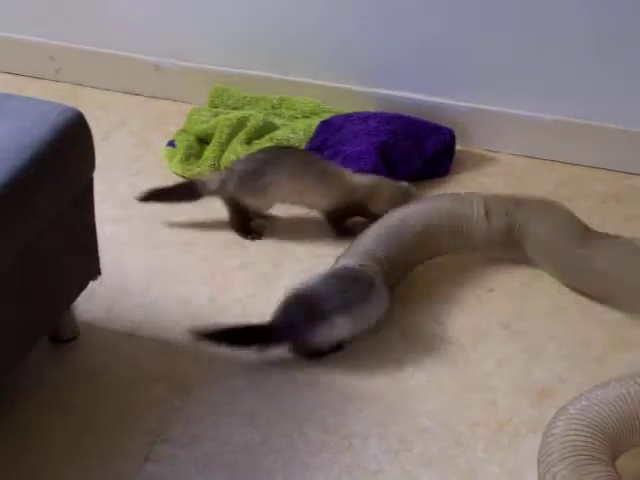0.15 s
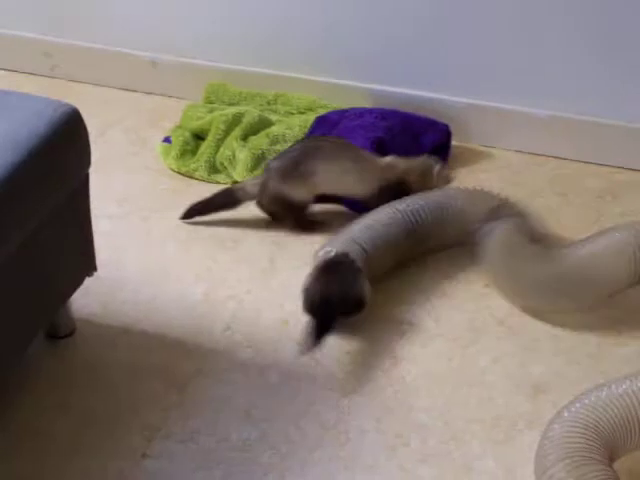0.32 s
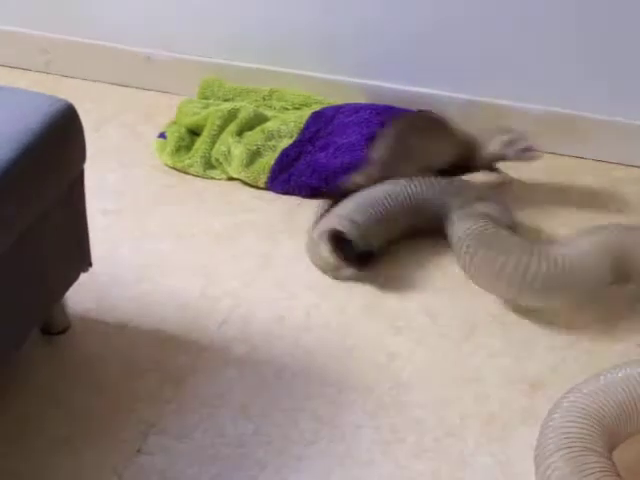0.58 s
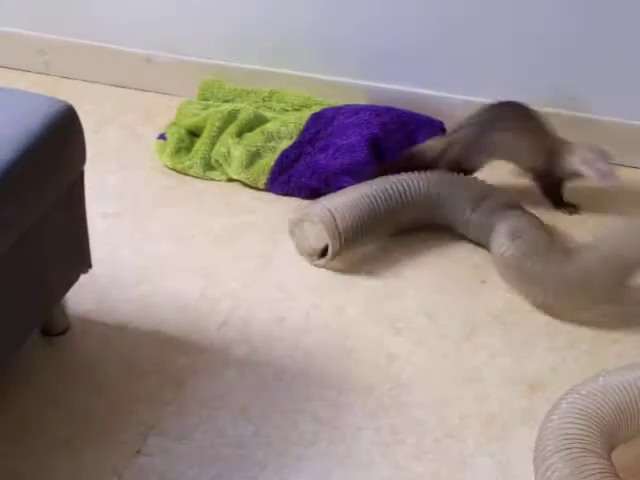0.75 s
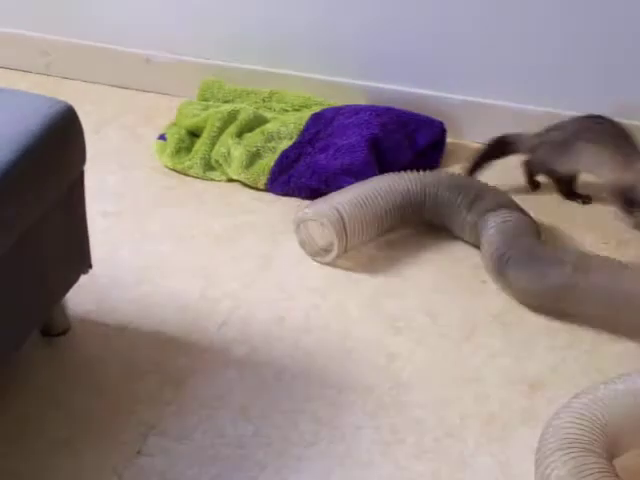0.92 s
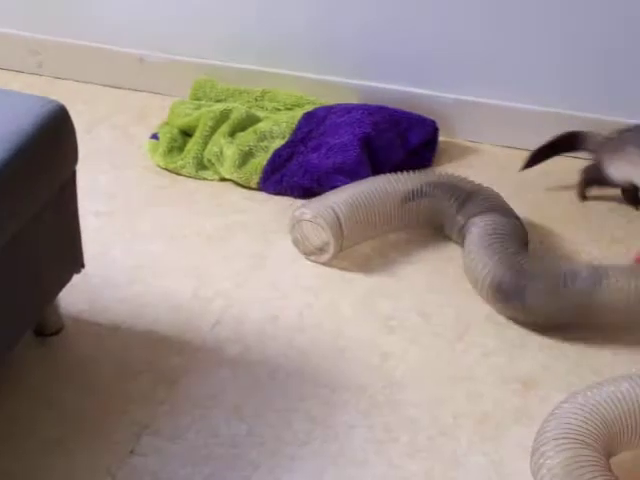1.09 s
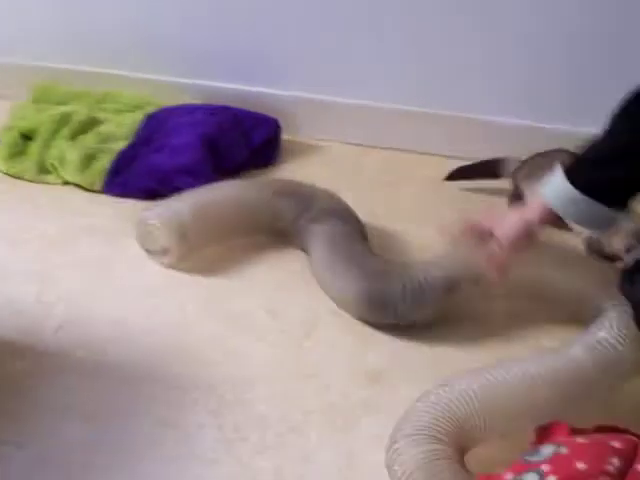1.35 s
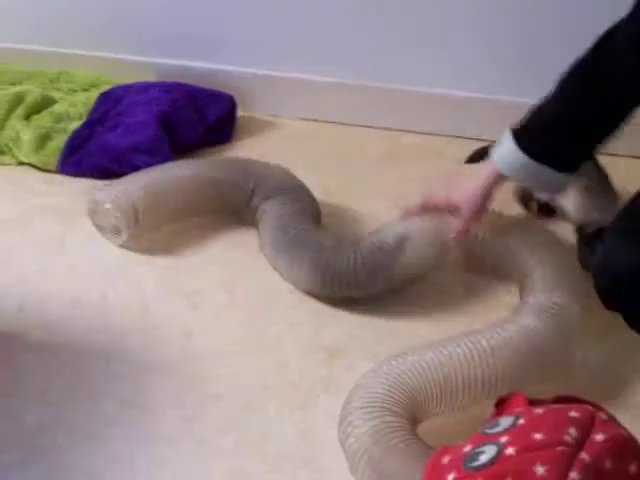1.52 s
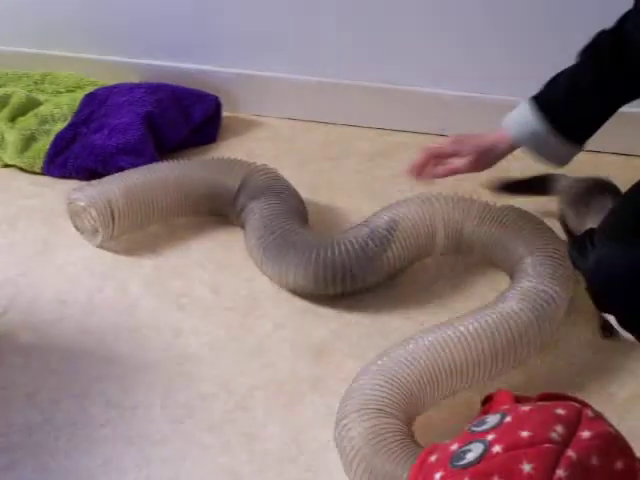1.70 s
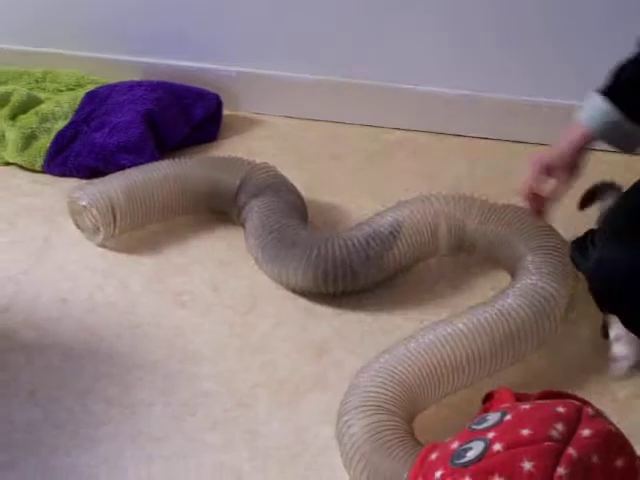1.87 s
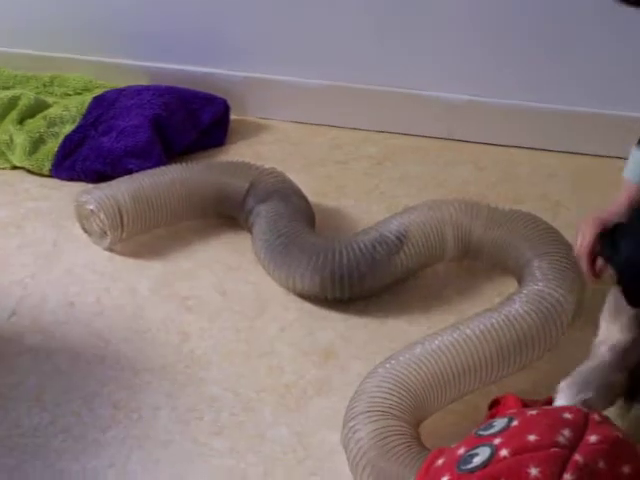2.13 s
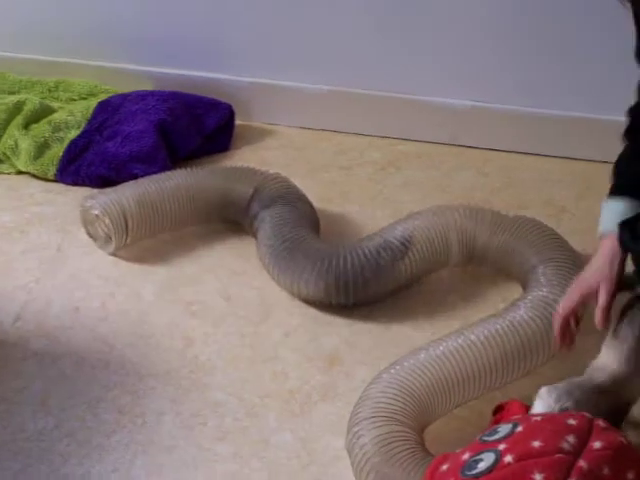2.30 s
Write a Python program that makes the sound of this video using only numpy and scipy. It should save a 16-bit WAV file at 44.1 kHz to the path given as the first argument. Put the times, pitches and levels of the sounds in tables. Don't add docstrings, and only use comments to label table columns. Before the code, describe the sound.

A corrugated plastic tube clatters on a hard floor as a ferret scrambles inside. Light clicks and scraping begin at once, swelling by 0.35 seconds into loud irregular knocks, strongest from 0.5 to 1.25, with rattling tails, hollow rings and dull thuds. Knocks continue until 1.8, then drop away. Around 2 seconds come a soft bump, tiny squeak and faint paw brushes, over quiet room air and short echoes.

```python
import sys
import numpy as np
from scipy import signal
from scipy.fft import rfft, irfft
from scipy.io import wavfile
from scipy.ndimage import uniform_filter1d

SR = 44100
rng = np.random.default_rng(int(sys.argv[2]) if len(sys.argv) > 2 else 0)


def waveform_to_disk(signal):
    frames = np.transpose(np.atleast_2d(signal))
    scaled = np.clip(frames, -1, 1) * 32767
    samples = np.round(scaled).astype(np.int16)
    wavfile.write(sys.argv[1], SR, samples)


def volts_from_decibels(level):
    exponent = np.asarray(level, float) / 20
    return 10 ** exponent


N = 103635

# start in seconds, peak level in dB.
KNOCKS = [(.082, -22), (.131, -27), (.221, -18), (.233, -15), (.349, -9), (.382, -10), (.475, -5),
          (.598, -18), (.65, -7), (.7, -3), (.865, -15), (.888, -6), (1.03, -16), (1.048, -3), (1.24, -2),
          (1.309, -17), (1.424, -20), (1.457, -8), (1.529, -15), (1.579, -22), (1.65, -13), (1.659, -7),
          (1.803, -8)]
# wall ring level in dB, wall pitch in Hz, clatter tail level in dB.
KNOCK_AFTERMATH = [(-40.5, 1100, -11), (-40.5, 1700, -8.5), (-31.5, 870, -27), (-28, 734, -35.5),
                   (-28, 590, -7.5), (-24, 1000, -21.5), (-27, 880, -13), (-27.5, 750, -12.5),
                   (-23.5, 1040, -22), (-23, 1230, -13.5), (-35, 1700, -21.5), (-24.5, 1540, -16),
                   (-37.5, 920, -11), (-30.5, 1500, -15.5), (-24, 850, -30.5), (-30, 860, -14),
                   (-29.5, 970, -5.5), (-34, 590, -14), (-28.5, 1050, -10), (-31, 900, -11.5),
                   (-23, 1040, -23.5), (-44.5, 460, -16.5), (-27.5, 900, -16.5)]
# frequency in Hz, level in dB per Hz.
RIB_COLOUR = [(260, -27), (450, -14), (620, -1.5), (1190, -7.5), (2070, -3), (3110, 4), (3650, 5.5),
              (6670, -12), (8530, -23.5), (11100, -17.5), (18800, -120)]
# start in seconds, peak level in dB, pitch in Hz.
AIR_RINGS = [(0.099, -43, 307), (0.223, -37, 465), (0.354, -19, 273), (0.418, -28, 313), (0.465, -24, 311),
             (0.493, -24.5, 296), (0.598, -21, 325), (0.641, -26, 350), (0.7, -21.5, 331),
             (0.89, -21.5, 336), (0.974, -27, 257), (1.048, -19, 376.5), (1.118, -33, 390),
             (1.241, -22, 373), (1.305, -29, 295), (1.387, -28, 255), (1.41, -23.5, 267),
             (1.456, -21.5, 367), (1.526, -30.5, 368), (1.637, -31.5, 241), (1.69, -30.5, 299),
             (1.805, -32, 323), (2.08, -45, 372), (2.169, -38, 310), (2.321, -43, 385)]
# start in seconds, peak level in dB, pitch in Hz.
FLOOR_THUDS = [(0.223, -22.5, 105.7), (0.367, -19, 127), (0.476, -19, 102.4), (0.666, -20.5, 126),
               (0.713, -21, 145), (0.893, -25, 98.4), (1.052, -21, 105), (1.087, -29, 143),
               (1.226, -25, 102), (1.258, -22, 99.6), (1.466, -22.5, 118), (1.608, -27.5, 106),
               (1.658, -26, 156.6), (1.729, -33, 138), (1.814, -25, 107), (2.059, -36.5, 108),
               (2.128, -42.5, 172)]
# time in seconds, scrape level in dB, rumble level in dB.
DRAG_LEVELS = [(0.0, -39, -48), (0.13, -36.5, -45), (0.27, -28, -39), (0.48, -21.5, -35), (0.57, -23, -30),
               (0.92, -25, -37.5), (1.15, -22, -32), (1.27, -24.5, -37), (1.52, -31, -34), (1.67, -22, -40),
               (1.75, -50, -35), (1.91, -69, -42.5), (2.12, -55, -61), (2.29, -44.5, -52.5)]
# frequency in Hz, level in dB per Hz.
HOLLOW_COLOUR = [(15, -56.5), (25, -10), (59, 0.5), (87, 3), (124, 4), (214, 4), (369, 7), (447, -6),
                 (520, -11), (680, -40), (1140, -120)]
# start in seconds, length in seconds, level in dB.
PAW_SHUFFLES = [
    (1.95, .03, -48),
    (1.97, 0.045, -36.5),
    (2.107, .07, -40.5),
    (2.292, .07, -38.5),
]
# start in seconds, length in seconds, level in dB, pitch in Hz, width in Hz.
BODY_BUMP = (1.968, .085, -31, 165, 110)
# start in seconds, level in dB, pitch in Hz.
CLAW_TICK = (2.071, -37, 2500)
# frequency in Hz, level in dB per Hz.
AIR_COLOUR = [(15, -27.5), (25, 27.5), (294, 2.5), (642, -9), (743, -1), (1070, 3.5), (2120, -29.5),
              (5370, 6), (8530, -8.5), (11100, -42.5), (18800, -120)]

FLURRY_S, FLURRY_DB, FLURRY_SPREAD_DB = 0.0055, -1.5, 2.5
WALL_WIDTH_HZ, WALL_DB, CLATTER_T60_S = 800, 3.5, 0.18
RING_RISE_S, RING_T60_S = 0.0037, 0.065
THUD_RISE_S, THUD_T60_S = 0.012, 0.11
SCRAPES_PER_S, SCRAPE_SPREAD_DB, SCRAPE_DB, RUMBLE_DB = 2500, 6.5, -7.5, -3
ROOM_T60_S, ROOM_TREBLE_T60_S, ROOM_GAP_S, ROOM_DULL_HZ = 0.45, 0.17, 0.0074, 4840
ROOM_DB, LOW_ROOM_DB, ROOM_PLACES = -4, -11, 36
AIR_DB = -59.5
TOP_HZ, OVERLOAD = 9180, 0.705


def unit(x):
    return x / np.sqrt(np.mean(x ** 2))


def minimum_phase(colour):
    hz, db = np.array(colour).T
    size = 2 ** 13
    f = np.arange(size // 2 + 1) * SR / size + 1
    level_db = np.interp(np.log(f), np.log(hz), db, left=db[0] - 23, right=db[-1] - 5.5)
    cepstrum = irfft(level_db * np.log(10) / 20)
    cepstrum[1:size // 2] *= 2
    cepstrum[size // 2 + 1:] = 0
    h = irfft(np.exp(rfft(cepstrum)))[:size // 2]
    return h / np.sqrt(np.sum(h ** 2))


def coloured(x, colour):
    return signal.fftconvolve(x, minimum_phase(colour))[:N]


def resonate(x, hz, width_hz):
    mode = signal.iirpeak(hz, hz / width_hz, SR)
    return signal.lfilter(*mode, signal.lfilter(*mode, x))


def wander(rate_hz):
    k = int(SR / rate_hz)
    return unit(uniform_filter1d(uniform_filter1d(rng.standard_normal(N), k), k))


def clicks(per_s, spread_db):
    present = rng.random(N) < per_s / SR
    size = volts_from_decibels(spread_db * np.minimum(rng.exponential(size=N), 3))
    return unit(present * size * np.sign(rng.standard_normal(N)))


def since(at):
    return np.maximum(np.arange(N) / SR - at, 0)


def swell(at, length, rise):
    u = np.minimum(since(at) / length, 1)
    return 2 * u ** rise * np.sqrt(1 - u)


def knocks():
    out, ribs = np.zeros(N), minimum_phase(RIB_COLOUR)
    impacts = signal.lfilter(*signal.butter(1, 6000, fs=SR), clicks(6000, FLURRY_SPREAD_DB))
    wall_blows = clicks(9000, 1)
    bounces = clicks(1500, 1.23) * volts_from_decibels(2.47 * wander(86))
    s = np.arange(SR // 4) / SR
    flurry = np.exp(-(s / FLURRY_S) ** 4)
    for (at, db), (wall_db, hz, tail_db) in zip(KNOCKS, KNOCK_AFTERMATH):
        start = int((at - 0.0002) * SR)
        span = slice(start, start + len(s))
        tail = volts_from_decibels(tail_db - 60 * s / CLATTER_T60_S) * np.minimum(s / 0.015, 1)
        hit = signal.fftconvolve(flurry * impacts[span], ribs)[:len(s)]
        clatter = signal.fftconvolve(tail * bounces[span], ribs)[:len(s)]
        wall = unit(resonate(wall_blows[span], hz, WALL_WIDTH_HZ))
        wall *= np.exp(-(s / 0.01) ** 2) + 0.5 * tail
        out[span] += volts_from_decibels(db) * (volts_from_decibels(FLURRY_DB) * hit / np.abs(hit).max() + clatter)
        out[span] += volts_from_decibels(wall_db + WALL_DB) * wall
    return out


def low_modes(table, rise_s, t60_s, rough):
    out = np.zeros(N)
    for at, db, hz in table:
        s = since(at)
        ratio, turn = 1.2 + 0.47 * rng.random(), rng.random()
        tone = np.sin(2 * np.pi * hz * s)
        tone += rough * np.sin(2 * np.pi * (hz * ratio * s + turn))
        out += volts_from_decibels(db - 60 * s / t60_s + 6.5) * (1 - np.exp(-s / rise_s)) * tone
    return out


def air_rings():
    return low_modes(AIR_RINGS, RING_RISE_S, RING_T60_S, rough=0.33)


def floor_thuds():
    return low_modes(FLOOR_THUDS, THUD_RISE_S, THUD_T60_S, rough=0.43)


def drag():
    at, scrape_db, rumble_db = np.array(DRAG_LEVELS).T
    t = np.arange(N) / SR
    ribs = unit(coloured(clicks(SCRAPES_PER_S, SCRAPE_SPREAD_DB), RIB_COLOUR))
    claws = unit(resonate(clicks(1200, 4.6), 4800, 2000)) * volts_from_decibels(-10 + 4.7 * wander(26))
    body = unit(resonate(clicks(1200, 3.4), 1200, 1100)) * volts_from_decibels(-7.5 + 2.2 * wander(14))
    rumble = unit(coloured(clicks(800, 2), HOLLOW_COLOUR)) * volts_from_decibels(2.5 * wander(14))
    scrape = ribs * volts_from_decibels(2 * wander(37)) + claws + body
    scrape *= volts_from_decibels(np.interp(t, at, scrape_db) + SCRAPE_DB)
    return scrape, rumble * volts_from_decibels(np.interp(t, at, rumble_db) + RUMBLE_DB)


def paw_brushes():
    envelope = sum(volts_from_decibels(db) * swell(at, length, 0.61) for at, length, db in PAW_SHUFFLES)
    return envelope * unit(coloured(clicks(3000, 2), RIB_COLOUR))


def even_out(x):
    return x / np.sqrt(uniform_filter1d(x ** 2, size=SR // 40))


def body_bump():
    at, length, db, hz, width_hz = BODY_BUMP
    grains = clicks(1800, 0.59)
    middle = signal.butter(4, (280, 600), "band", fs=SR, output="sos")
    low = even_out(resonate(grains, hz, width_hz))
    high = even_out(signal.sosfilt(middle, grains))
    bump = swell(at, length, 0.35) * low + volts_from_decibels(-9) * swell(at, 0.7 * length, 0.15) * high
    return volts_from_decibels(db - 2) * bump


def claw_tick():
    at, db, hz = CLAW_TICK
    s = since(at)
    envelope = np.sin(np.pi * np.minimum(s / 0.018, 1))
    return volts_from_decibels(db) * envelope * np.sin(2 * np.pi * hz * s + wander(300))


def room_response():
    s = np.arange(SR // 2) / SR
    dull = signal.lfilter(*signal.butter(1, ROOM_DULL_HZ, fs=SR), rng.standard_normal(len(s)))
    bright = rng.standard_normal(len(s)) * volts_from_decibels(-60 * s / ROOM_TREBLE_T60_S)
    onset = np.clip((s - ROOM_GAP_S) / 0.002, 0, 1)
    h = (dull + bright) * volts_from_decibels(-60 * s / ROOM_T60_S) * onset
    return h / np.sqrt(np.sum(h ** 2))


def room_echo(x):
    hop = N // ROOM_PLACES + 1
    x, out = np.pad(x, (hop, 2 * hop)), np.zeros(N + 3 * hop + SR // 2)
    for i in range(0, N + hop, hop):
        y = signal.fftconvolve(x[i:i + 2 * hop] * np.hanning(2 * hop), room_response())
        out[i:i + len(y)] += y
    return out[hop:hop + N]


def room_air():
    return volts_from_decibels(AIR_DB) * unit(coloured(rng.standard_normal(N), AIR_COLOUR))


def scene():
    scrape, rumble = drag()
    bump = body_bump()
    brush = paw_brushes()
    high = knocks() + scrape + brush
    low = rumble + bump + claw_tick() + floor_thuds() + air_rings()
    wet = room_echo(volts_from_decibels(ROOM_DB) * high + volts_from_decibels(LOW_ROOM_DB) * low)
    return (high + low + wet + room_air())[None]


def roll_off(x):
    return signal.sosfilt(signal.butter(12, 8680, fs=SR, output="sos"), x)


def record(dry):
    steep = signal.cheby2(10, 60, TOP_HZ * 1.0555, fs=SR, output="sos")
    mix = np.clip(signal.sosfilt(steep, dry), -OVERLOAD, OVERLOAD)
    return roll_off(mix)


dry = scene()
out = record(dry)
waveform_to_disk(out)
```